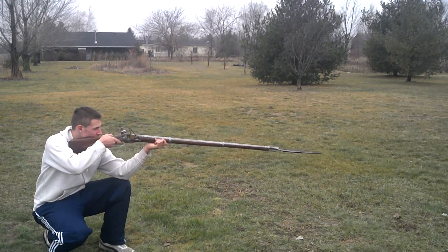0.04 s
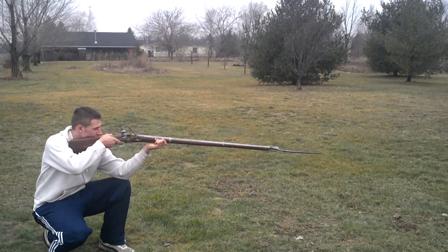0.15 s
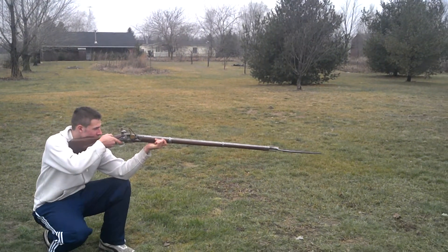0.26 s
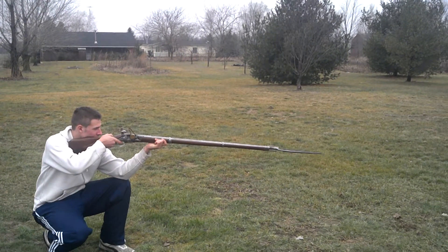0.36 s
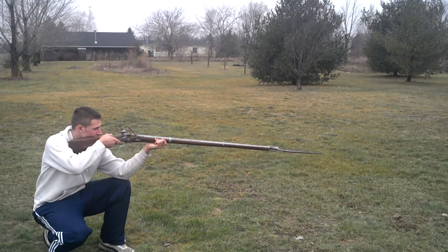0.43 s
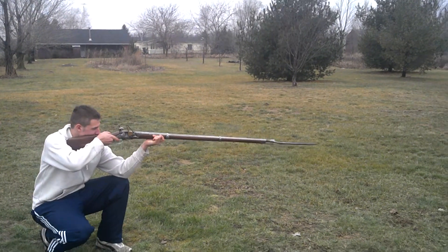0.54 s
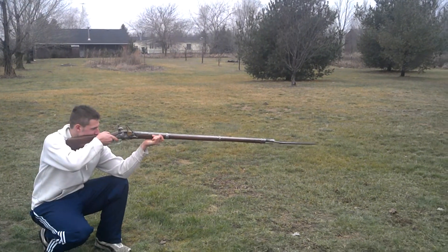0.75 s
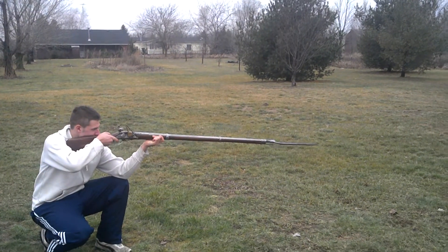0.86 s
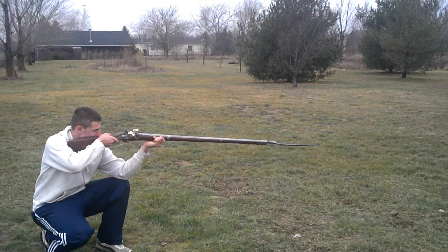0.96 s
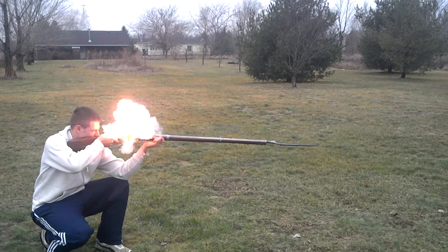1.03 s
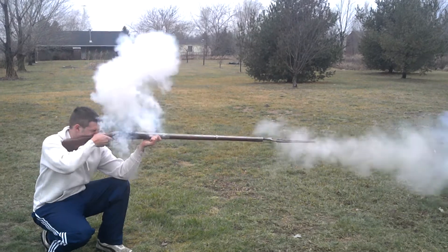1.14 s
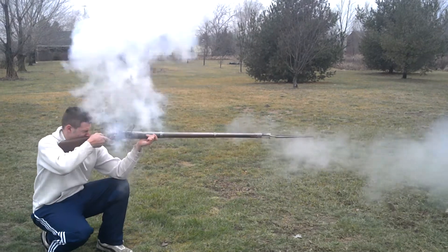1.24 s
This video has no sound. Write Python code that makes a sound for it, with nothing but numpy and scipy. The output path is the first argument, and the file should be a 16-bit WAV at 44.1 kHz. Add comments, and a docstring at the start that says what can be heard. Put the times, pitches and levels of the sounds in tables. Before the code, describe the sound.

Flint scrapes steel, priming powder puffs, and almost at once a musket blasts, overloading the nearby stereo microphone; quick slaps and a patchy, rumbling tail roll away across an open lawn.

```python
"""A flintlock musket fires on an open lawn, a few metres from two small, closely spaced microphone ports.
Noise bursts make the flint scraping the steel; a tone with noise makes the priming powder whoomp.
The charge is a pressure jump with a noise crack and roar; fading noise makes the slaps and the long
scattered tail from trees and houses. One port catches wind, the other goes deaf briefly under the blast."""
import sys
import numpy as np
from scipy import signal
from scipy.io import wavfile
from scipy.ndimage import uniform_filter1d

SR = 44100
rng = np.random.default_rng(int(sys.argv[2]) if len(sys.argv) > 2 else 0)


def master(y):
    """Save y as 16-bit WAV."""
    cut = np.clip(np.atleast_2d(y).T, -1, 1)
    pcm = np.round(cut * 32767)  # scale
    wavfile.write(sys.argv[1], SR, pcm.astype(np.int16))


N = 57330  # length in samples
T = np.arange(N) / SR  # time in seconds
CRACK_S = .328  # start of the shot
PATCHY_HZ = 60  # how often the scattered sound gets a new random level


def undb(db):
    """Turn decibels into a plain gain."""
    return 10 ** (np.asarray(db) / 20)


def band(hz, width_hz):
    """Filter white noise to a pitch range and scale it to an rms of 1."""
    high = np.sqrt(hz ** 2 + width_hz ** 2 / 4) + width_hz / 2
    high = min(high, .45 * SR)
    low = min(hz ** 2 / high, .9 * high)
    sos = signal.butter(3, [low, high], "bandpass", fs=SR, output="sos")
    noise = signal.sosfilt(sos, rng.standard_normal(N))
    return noise / noise.std()


def colour(table):
    """Add noise bands, each at its own level, to give noise a tone colour."""
    return sum(undb(db) * band(hz, 0.73 * hz) for hz, db in table)


def shape(start, attack, t60, hold=0.):
    """Loudness curve: straight rise, hold, then an exponential fall of 60 dB in t60 seconds."""
    since = T - start
    rise = np.clip(since / attack, 0, 1)
    falling = np.clip(since - attack - hold, 0, None)
    return rise * undb(-60 * falling / t60)


def walk(rate_hz):
    """Random levels, each held for one step, then smoothed twice so they glide; spread near 1."""
    step = int(SR / rate_hz)
    held = rng.standard_normal(N)[np.arange(N) // step]
    return 1.08 * uniform_filter1d(uniform_filter1d(held, step), step)


def ports(sound, lead, second_db=0.):
    """One sound reaches both ports, the second earlier by lead samples (later if negative)."""
    second = np.interp(np.arange(N) + lead, np.arange(N), sound)
    return np.array([sound, undb(second_db) * second])


def floor():
    """Gusty wind noise on the first port, fainter once the shot starts, over still air on both."""
    # wind noise bands: pitch_hz [Hz], level_db [dB, before gusts and drop]
    wind_bands = [(50, -58.5), (100, -46), (200, -52), (400, -58), (800, -68)]
    # still-air noise bands: pitch_hz [Hz], level_db [dB]
    air_bands = [(120, -70), (400, -77), (1000, -76.5), (2000, -74), (4500, -73), (9000, -80), (13000, -88)]
    drop_db, gust_db, gust_hz = -30, 1.5, 16
    level_db = gust_db * walk(gust_hz) + drop_db * (T > CRACK_S)
    wind = undb(level_db) * colour(wind_bands)
    air = np.array([colour(air_bands), colour(air_bands)])
    return [[1], [0]] * wind + air


def lock():
    """Flint on steel and sparks are gritty noise bursts; priming powder adds a swelling low tone."""
    # lock and priming bursts: start_s [s], level_db [dB, before grit and port gain], pitch_hz [Hz],
    # width_hz [Hz], attack_s [s], t60_s [s], second_port_lead [samples]
    lock_bursts = [(.1935, -38, 3800, 6000, .002, .06, 3), (.2035, -23, 1300, 1700, .007, .045, 1),
                   (.203, -26, 5500, 7000, .007, .06, 3), (.2035, -36, 350, 350, .006, .06, 1),
                   (.244, -33, 130, 120, .012, .12, 1), (.1945, -39, 1950, 500, .002, .05, -3),
                   (.2035, -30, 1950, 500, .003, .09, -3), (.2405, -35, 1950, 600, .002, .1, -3),
                   (.219, -31, 5000, 8000, .002, .05, 3), (.2405, -33, 5000, 7000, .003, .12, 3),
                   (.245, -33, 900, 1000, .016, .09, 1), (.268, -37, 5000, 6000, .002, .1, 3),
                   (.296, -40, 1300, 1800, .004, .05, 1), (.296, -44, 4500, 6000, .003, .15, 3)]
    whoomp_s, whoomp_attack_s, whoomp_t60_s = 0.238, 0.025, 0.072
    whoomp_db, whoomp_hz, whoomp_width_hz = -28, 364.4, 200
    tone = 1.3 * np.sin(2 * np.pi * whoomp_hz * T)
    breath = 0.73 * band(whoomp_hz, whoomp_width_hz)
    whoomp = undb(whoomp_db) * shape(whoomp_s, whoomp_attack_s, whoomp_t60_s) * (tone + breath)
    out = ports(whoomp, 0.57)
    for start, db, hz, width_hz, attack, t60, lead in lock_bursts:
        gritty = undb(db + 3.1 * walk(900)) * shape(start, attack, t60)
        out = out + ports(gritty * band(hz, width_hz), lead, 3.8)
        # bright bursts get extra, unrelated noise on the first port
        extra = gritty * band(hz, width_hz) * (hz > 2500)
        out = out + [[.7], [0]] * extra
    return out


def blast():
    """N-shaped pressure jump, noisy crack, roaring gas cloud and air swinging back after the jump."""
    # crack noise bands: pitch_hz [Hz], relative_level_db [dB]
    crack_bands = [(150, -1.5), (350, -3), (700, -3), (1300, -2), (3000, -35), (6000, -5), (12000, -13.5)]
    # gas-cloud noise bands: pitch_hz [Hz], relative_level_db [dB]
    roar_bands = [(95, -2), (150, -4), (260, 0.5), (420, -5.5), (750, -14), (1500, -9.5), (3000, -21.5),
                  (6000, -18), (11000, -35)]
    jump_db, jump_length_s = 6, .0045
    crack_db, crack_attack_s, crack_hold_s, crack_t60_s = 7.5, .0011, .0045, 0.0056
    roar_s, roar_end_s = .336, 0.3947  # the fall begins one attack time after roar_end_s
    roar_db, roar_attack_s, roar_t60_s = -7.5, .0036, 0.065
    rebound_s, rebound_db, rebound_hz, rebound_t60_s = .3335, -0.5, 165, .03

    # pressure leaps up, falls in a straight line below rest, then leaps back
    progress = (T - CRACK_S) / jump_length_s
    jump = undb(jump_db) * (1 - 2 * progress) * (progress > 0) * (progress < 1)

    crack_noise = np.array([colour(crack_bands), colour(crack_bands)]) / 2
    crack = undb(crack_db) * shape(CRACK_S, crack_attack_s, crack_t60_s, crack_hold_s) * crack_noise

    gas = colour(roar_bands)
    gas = gas / np.sqrt(uniform_filter1d(gas ** 2, size=600))  # even loudness: churns without pause
    roar = undb(roar_db) * shape(roar_s, roar_attack_s, roar_t60_s, roar_end_s - roar_s) * gas

    since = np.clip(T - rebound_s, 0, None)
    fading = undb(rebound_db - 60 * since / rebound_t60_s)
    rebound = fading * np.sin(2 * np.pi * rebound_hz * since)
    return ports(jump, 9.9) + crack + ports(roar + rebound, 4.4)


def slaps():
    """Single walls and trunks return the crack as short smeared noise bursts."""
    # slap echoes: start_s [s], level_db [dB], pitch_hz [Hz], width_hz [Hz], hold_s [s], t60_s [s],
    # second_port_db [dB], second_port_lead [samples]
    slap_echoes = [(0.3394, -12, 4500, 13000, 0.00086, 0.0073, -2, 2.3),
                   (0.342, -15.5, 3340, 7760, 0.0014, 0.048, -10, 2.2),
                   (0.383, -14.5, 1960, 1740, 0.0032, 0.079, 6, 3.6),
                   (0.447, -30, 1800, 2500, 0.0018, .05, -5, 2.7),
                   (0.467, -25, 1390, 2000, 0.0017, 0.098, -6.5, 8.1),
                   (0.6203, -31, 1226, 1570, 0.0017, 0.045, 2.5, 8.8),
                   (0.72, -39, 1040, 740, 0.0059, 0.022, -5, 3.6),
                   (.7465, -33, 2000, 2550, 0.0043, 0.014, 0.5, 6.46),
                   (0.784, -57, 1150, 870, 0.0026, 0.042, -7, 3),
                   (.8043, -31, 3460, 4260, 0.0019, 0.032, 10.5, 6.7),
                   (0.813, -49.5, 1360, 1270, 0.0023, 0.075, 10, 1.9),
                   (0.8586, -38, 2600, 3200, 0.00092, 0.046, 10, 13),
                   (0.879, -47, 3430, 4250, 0.0023, 0.072, 10, 7.8),
                   (0.934, -47, 2700, 2430, 0.0037, .06, 9.5, 5.4)]
    attack_s = 0.00074
    out = 0
    for start, db, hz, width_hz, hold, t60, second_db, lead in slap_echoes:
        env = shape(start, attack_s, t60, hold)
        echo = env * undb(0.83 * walk(700)) * band(hz, width_hz)
        echo = echo * np.sqrt(env @ env / (echo @ echo))  # same energy as its loudness curve
        out = out + ports(undb(db) * echo, lead, second_db)
    return out


def tail():
    """Patchy scatter with a near and a far fade per band; low bands are more alike at the two ports."""
    # scattered bands: pitch_hz [Hz], near_db [dB, before patches], near_t60_s [s],
    # far_db [dB, before patches], far_t60_s [s], likeness of the ports [0-1],
    # second_port_db [dB], second_port_lead [samples, for the shared part]
    scatter_bands = [(97.2, -31, 0.23, -45, 8.3, 1, -0.1, 3.7),
                     (149, -22.5, 0.76, -41.5, 5.7, .98, -0.5, 3.5),
                     (228, -21.5, 0.51, -51.5, 1.73, 0.97, 0.6, 3.6),
                     (398, -23.5, 0.3, -63, 3.3, 0.86, -0.5, 3.6),
                     (844, -29.5, 0.51, -51.5, 5.37, 0.77, -0.5, 4.9),
                     (1307, -30.5, 0.44, -52, 5.6, 0.74, 2, 5.9),
                     (1980, -27.5, 0.61, -47.5, 4.2, 0.71, 2.5, 14.7),
                     (3580, -33, 0.47, -50, 2.33, 0, 4.5, 13.9),
                     (5970, -34.5, 0.57, -52, 1.68, 0.1, 6.5, 18),
                     (8500, -41, 0.34, -75.5, 1.5, 0.2, -6, 14), (13100, -62, 0.91, -80, 1.5, 0.2, 1, 14)]
    start_s, attack_s, patchy_db = .388, 0.013, 2.5
    out, shared_patches = 0, walk(PATCHY_HZ)
    for hz, near_db, near_t60, far_db, far_t60, like, second_db, lead in scatter_bands:
        near = undb(near_db) * shape(start_s, attack_s, near_t60)
        far = undb(far_db) * shape(start_s, attack_s, far_t60)
        like = np.clip(like, 0, 1)
        together = ports(band(hz, 0.46 * hz), lead)
        apart = np.array([band(hz, 0.48 * hz), band(hz, 0.58 * hz)])
        pair = np.sqrt(like) * together + np.sqrt(1 - like) * apart
        patches = patchy_db * (.6 * shared_patches + .8 * walk(PATCHY_HZ))
        out = out + (near + far) * undb(patches) * pair * undb([[0], [second_db]])
    return out


def trees():
    """Rows of trees return broad, late swells of noise, partly alike at the two ports."""
    # tree-row returns: start_s [s], level_db [dB, before patches and port mix], pitch_hz [Hz],
    # width_hz [Hz], attack_s [s], hold_s [s], t60_s [s]
    tree_rows = [(0.498, -35.5, 216, 166, 0.023, 0.053, 0.23),
                 (0.723, -51.5, 1386, 1620, 0.039, 0.14, 0.71)]
    out = 0
    for start, db, hz, width_hz, attack, hold, t60 in tree_rows:
        # higher swells differ more between the ports
        apart = min(hz / 2000, 1) * np.array([band(hz, width_hz), band(hz, width_hz)])
        together = ports(band(hz, width_hz), 2.8, 0.61)
        swell = undb(db + 4.7 * walk(PATCHY_HZ)) * shape(start, attack, t60, hold)
        out = out + swell * (together + apart)
    return out


def scene():
    """Add up the sound pressure at the two ports."""
    return floor() + lock() + blast() + slaps() + tail() + trees()


def late(port):
    """Delay one port's signal by a few samples."""
    lag = 17  # samples
    return np.concatenate([np.zeros(lag), port[:-lag]])


def record(dry):
    """Ports saturate, the second drops out and pops back; each side is one port minus the other, delayed."""
    port_clip, out_clip, top_hz = 1.51, .98, 16000
    deaf_s, back_s, deaf_db = .3345, .3912, -30
    pop_db, pop_hz, pop_attack_s, pop_t60_s = -7, 165.5, .00066, .057
    lurch_db, lurch_length_s = -13, .008
    first, second = port_clip * np.tanh(dry / port_clip)

    deaf = (T > deaf_s) * (T < back_s)
    second = second * undb(uniform_filter1d(deaf_db * deaf, size=30))

    since = np.clip(T - back_s, 0, None)
    pop_env = np.clip(since / pop_attack_s, 0, 1) * undb(-60 * since / pop_t60_s)
    pop = undb(pop_db) * (since > 0) * pop_env * np.cos(2 * np.pi * pop_hz * since)
    second = second - pop

    # the overloaded amplifier lurches to one side and back
    lurch = undb(lurch_db) * np.sin(np.pi * np.clip((T - CRACK_S) / lurch_length_s, 0, 1))
    sides = np.array([first - late(second), second - late(first)]) + lurch
    sides = np.clip(sides, -out_clip, out_clip)
    lowpass = signal.ellip(8, .2, 70, top_hz, fs=SR, output="sos")
    return np.clip(signal.sosfilt(lowpass, sides), -1, 1)


dry = scene()
out = record(dry)
master(out)
```